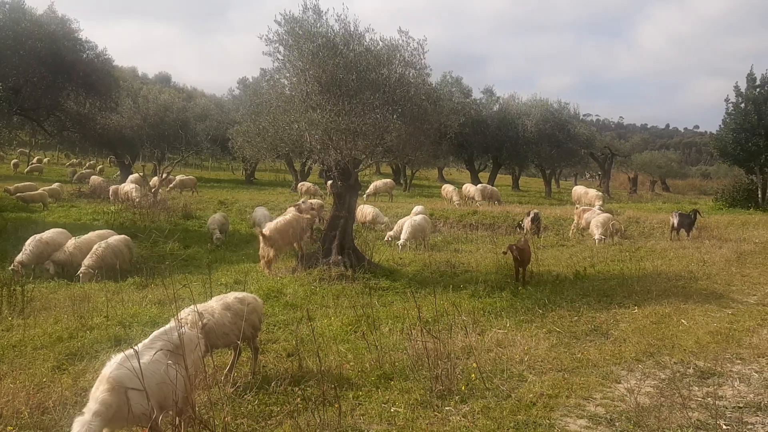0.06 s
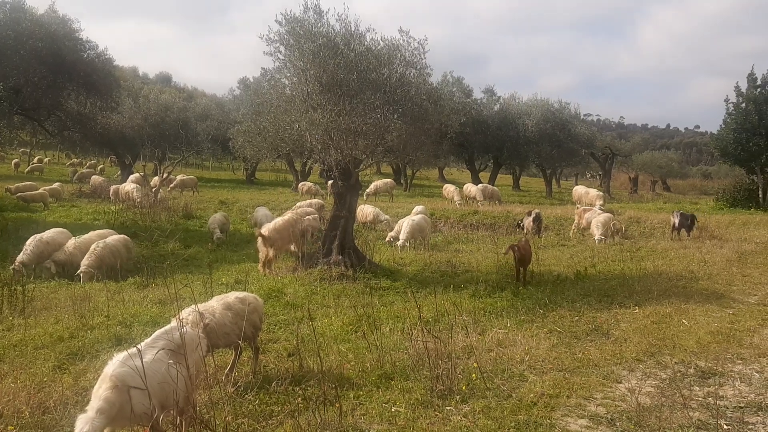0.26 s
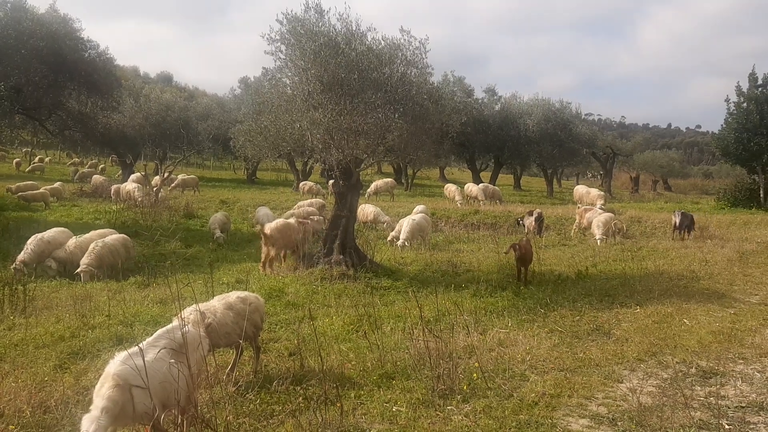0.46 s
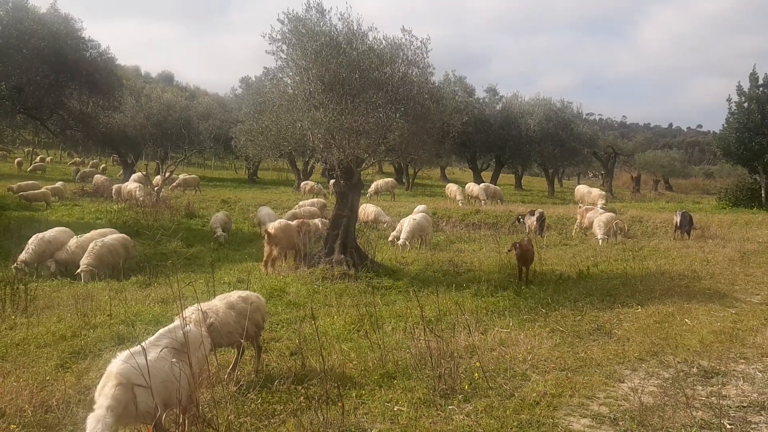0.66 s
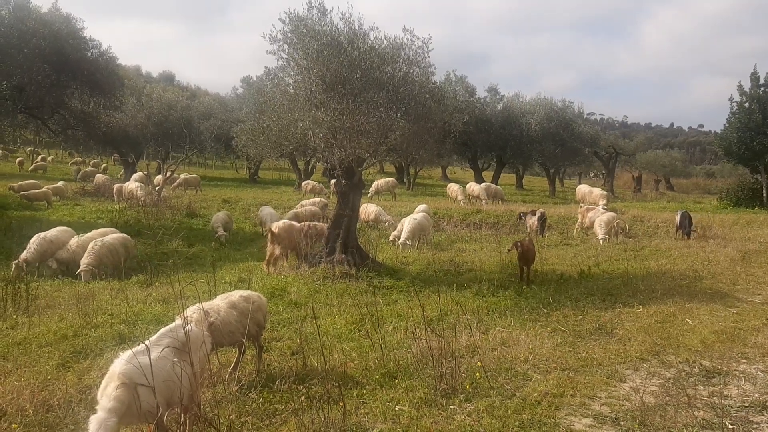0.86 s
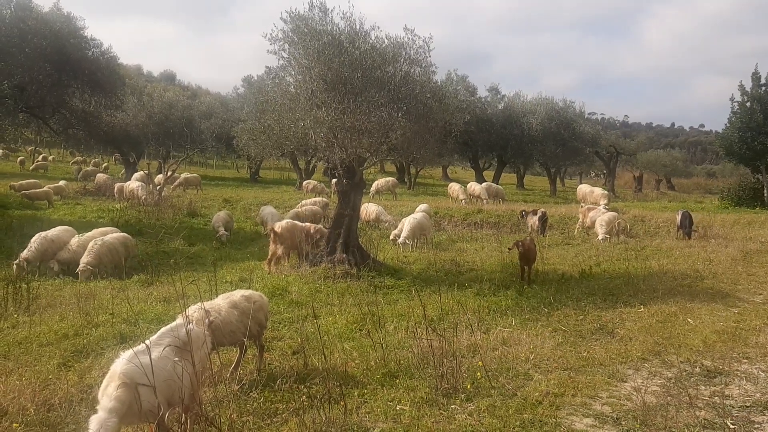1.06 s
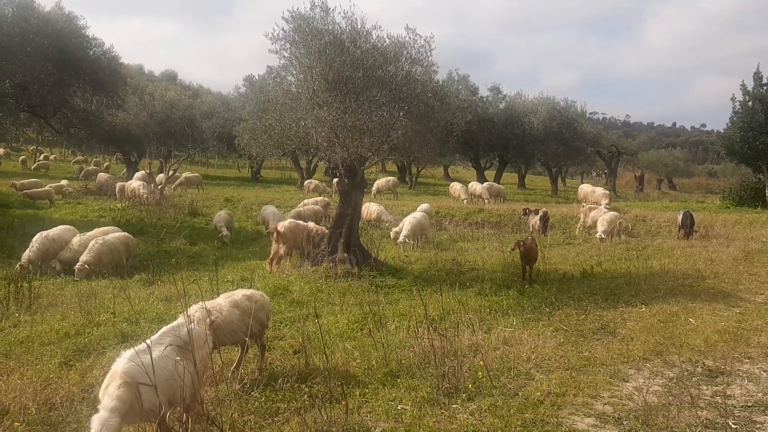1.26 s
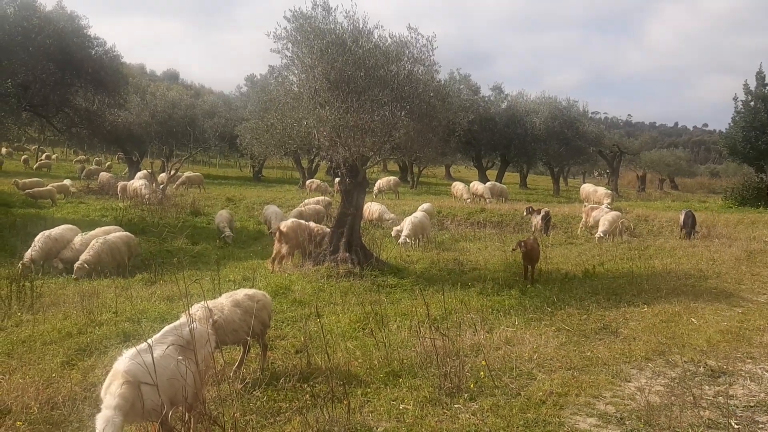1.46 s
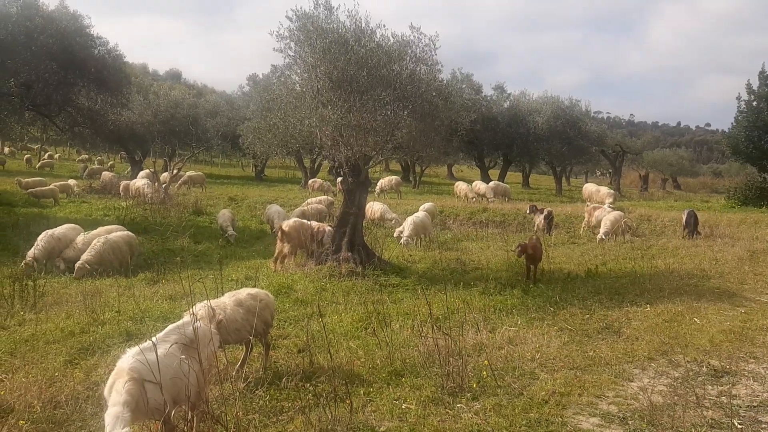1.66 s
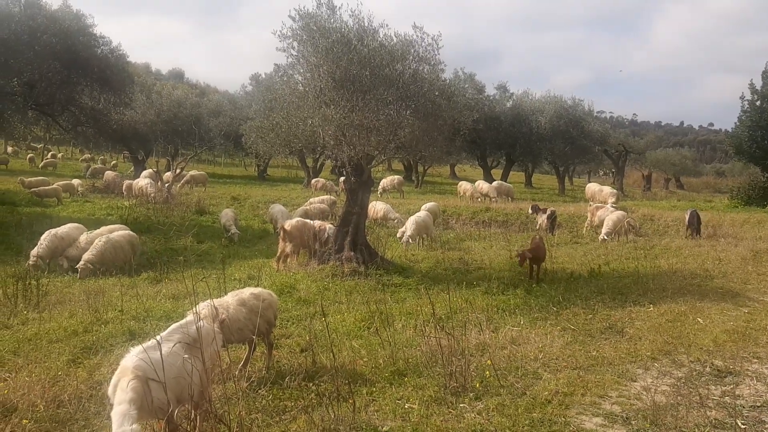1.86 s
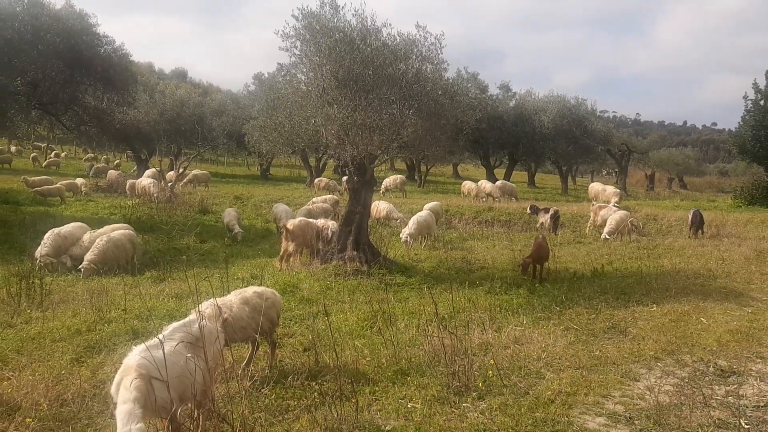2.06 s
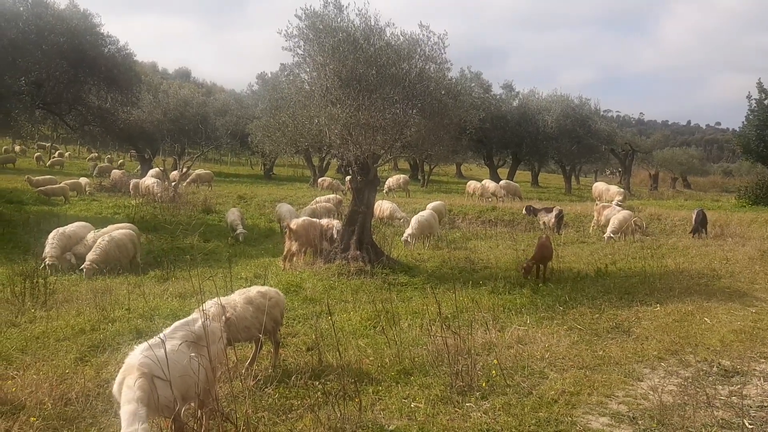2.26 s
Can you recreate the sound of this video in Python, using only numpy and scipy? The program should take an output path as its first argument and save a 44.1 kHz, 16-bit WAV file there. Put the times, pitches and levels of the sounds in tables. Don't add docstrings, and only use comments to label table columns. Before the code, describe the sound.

A metal sheep bell a few steps away clanks at uneven intervals, its wavering ring choked or left to fade; wind thumps on the left of a stereo microphone, grass tears, twigs tick, open grove hisses faintly.

```python
import sys
import numpy as np
from scipy import signal
from scipy.fft import rfft, irfft
from scipy.io import wavfile
from scipy.ndimage import uniform_filter1d

SR = 44100
rng = np.random.default_rng(int(sys.argv[2]) if len(sys.argv) > 2 else 0)


def undo_db(level):
    steps = np.asarray(level, float) / 20
    return 10 ** steps


def dump_mix(stems):
    frames = np.atleast_2d(stems).T
    limited = np.clip(frames, -1, 1)
    pcm = np.round(limited * 32767).astype(np.int16)
    wavfile.write(sys.argv[1], SR, pcm)


N = 101429
SIDE = np.array([[.5], [-.5]])

# (time [s], damping by the neck [ratio], old ring kept [0-1], high modes [dB],
# strike spot [turns])
BLOWS = [
    (0.2095, 0.68, 0.9, -35.5, 0.077),
    (.3466, 0.58, 0, -36, 0.27),
    (0.516, 1.756, 0.19, -28.5, 0.64),
    (0.648, 2.2, 0.69, -79, 0.22),
    (1.0837, 1.456, 0.6, -38, 0.85),
    (1.5263, 0.73, 1, -39.5, 0.7),
    (1.9686, 1.13, 0.6, -50, 0.96),
]
BLOW_FACES = [(0.038, 0.33), (0, 0.84), (0, 0.94), (.5, 1), (0.84, 1), (0, 0.58), (0.95, 0.95)]
# (lower member [Hz]), then (upper member [Hz])
LOWER_HZ = [850, 2214, 4178, 4876, 5887]
UPPER_HZ = [873, 2297, 4279, 5075, 6141]
# (decay T60 [s], left-right [dB], left leads [rad], swing [dB], swing start [turns])
LOWER_MODES = [(1.8, 0, 1 - 1 / 10, 1, 0.13), (0.95, 6.5, 1.42, 3, 0.11), (1.077, -7, -2, 0, 0.083),
               (0.2, -17, 5.5, -4, 0.08), (0.088, -21.5, -6, 0.5, 0.44)]
UPPER_MODES = [(0.62, -3, 1 - 1 / 10, 3.8, 0.24), (1.68, 11, 4.5, 0.33, 1), (0.64, -8.5, -2.5, 4.8, 0.93),
               (0.52, -6, 8, 0.72, 0.065), (0.26, -4, 8, 2, 0.72)]
# (pair 1 [dB], .. pair 5 [dB])
LOWER_DRIVE = [(-45, -56, -35.5, -38.5, -39), (-31, -52, -46, -31.5, -44), (-37, -29.5, -20, -22.5, -84),
               (-88, -88, -78, -39, -63), (-32.5, -35, -36, -41.5, -46.5), (-31, -42, -47, -41.5, -41),
               (-33, -38, -37, -34.5, -84)]
UPPER_DRIVE = [(-30.5, -72, -27, -53, -32), (-30.5, -45, -31, -55, -40.5), (-10, -38, -37, -26.5, -37),
               (-68, -86, -64, -56, -62), (-27, -50.5, -22, -31, -43), (-45.5, -40, -23, -52, -41.5),
               (-30.5, -41, -32, -47, -36)]
BEAT_STARTS = [(0.23, 0.47, 0.38, 0.0026, 0.68), (1, 0.67, 0.38, 0.55, 0.18), (1, 0.47, 1, 0.27, 0.66),
               (0, 0.2, 0, 0, 0), (0.49, 0.42, 0.38, 1, 0.46), (1, 0, 0.78, .13, 0.46),
               (0.35, 0.43, 0.77, 0.77, .76)]
# (level [dB], T60 [s], left-right [dB], start [turns])
TURNED_LOBES = [(-34.5, 5, 2.5, 0.21), (-38, 3.8, 12, 1), (-24.5, 1.7, -4, .9)]
TURNED_HZ = [850, 2297, 4279]
TURNED_LEAD = [0.97, 1.7, -2.1]
# (frequency [Hz], struck in front [dB], struck behind [dB], T60 [s], left-right
# [dB])
THIN_MODES = [(2560, 11, 12, 0.13, 6), (3870, -5, -10, 0.19, 1), (4530, -5, -9, 0.18, -6),
              (6672, 4, 7, 0.34, -9), (6813, -3, -4, 0.47, -7), (6925, 5, 13, 0.28, -9),
              (6998, 5, 8, 0.2, -4), (7582, -5, -7, 0.22, 2), (7935, 6, 14, 0.19, 4),
              (8125, -2, 12, 0.19, 5), (8250, 1, 1, 0.24, 2), (8320, -3, 9, 0.28, 0),
              (8607, -6, -44, 0.36, 0), (9765, -4, 11, 0.15, 3),
              (9880, 7, -14, 0.13, 3), (10118, -4, 12, 0.17, -1), (10252, -3, 7, 0.21, 6),
             (10590, -12, 8, 0.36, 1), (11073, 3, 5, 0.22, 2), (11203, 2, 4, 0.29, 0),
             (11862, 6, -9, 0.19, 5), (12405, 3, 7, 0.15, 4), (12603, 5, -16, 0.17, 14),
             (12740, 0, -9, 0.16, 8), (13125, 7, -3, 0.13, 8), (13410, -7, 10, 0.22, 10),
             (13925, -1, -1, 0.18, 4), (14270, -6, -14, 0.2, 3)]
# (frequency [Hz], level [dB])
CRACK_COLOUR = [(500, -20.5), (1500, -18.5), (2600, -5), (3300, -18.5), (5000, -0.5), (8000, -9.5),
                (9000, -3), (12000, -7.5)]
# (frequency [Hz], left-right [dB])
CLANK_PAN = [(2600, -0.5), (4500, -10), (8000, 16), (12000, 8.5)]
# (time [s], level [dB])
GUSTS = [(0, -88), (.3, -87), (.4, -77), (.47, -50), (.55, -61.5), (.6, -65), (.68, -65.5), (.75, -89),
         (1.2, -78.5), (1.4, -76.5), (1.47, -91), (1.65, -75), (1.78, -69.5), (2.0, -71), (2.12, -95),
         (2.2, -57), (2.26, -42.5), (2.3, -37.5)]
# (frequency [Hz], level [dB])
SOFT_WIND_COLOUR = [(15, -17.5), (30, -27), (58, 3), (120, -5), (200, -12), (400, -12), (900, -94)]
HARD_WIND_COLOUR = [(15, -47), (30, -9), (70, -8), (170, -8), (270, -21), (400, -43), (900, -92)]
# (time [s], level [dB], frequency [Hz], length [s])
BUFFETS = [(0.388, -46.5, 60, 0.0088), (.424, -48, 91, 0.0047), (0.4572, -25, 142, 0.0038),
           (.4737, -27, 92, 0.0066), (.4953, -33, 120, 0.0048), (0.503, -28.5, 70, 0.009),
           (0.514, -36, 169, 0.0018), (.5222, -28.5, 136, 0.0087), (.532, -26.5, 64.4, 0.0095),
           (0.556, -32.5, 58, 0.0097), (0.6534, -31.5, 78, 0.0083), (0.909, -59, 70, 0.011),
           (1.653, -45, 60, .012), (1.735, -32, 166, 0.0034), (1.737, -20.5, 72.4, 0.011),
           (1.836, -46.5, 64, 0.023), (1.928, -39, 54.6, .013), (2.147, -37.5, 81.6, 0.0052),
           (2.16, -39, 50.7, 0.0092), (2.184, -39, 50.6, 0.0093), (2.201, -34, 88.35, 0.0058),
           (2.2214, -24, 90, 0.0044), (2.232, -29, 80, 0.0057), (2.24, -25, 80, 0.0079),
           (2.252, -32, 60, 0.011), (2.2686, -24.5, 160, 0.0026), (2.275, -22.5, 125, 0.0037),
           (2.286, -21, 141, 0.0025), (2.2905, -18.5, 87.5, 0.006)]
# (time [s], length [s], level [dB])
TEARS = [
    (0.57, 0.049, -61.5),
    (2.006, 0.099, -38.5),
]
# (frequency [Hz], level [dB])
TEAR_COLOUR = [(200, -1.5), (350, 6), (600, -15.5), (1400, -4.5), (2700, -1.5), (3500, -10.5), (6000, -12),
               (12000, -51)]
# (time [s], level [dB], frequency [Hz], left-right [dB])
TICKS = [(.0169, -55.5, 8000, 11), (0.1108, -56, 10600, 19), (0.184, -65, 3370, -4), (0.61, -42, 3300, 2),
         (.638, -33, 3150, 1), (.656, -43, 3000, -3), (0.6872, -43, 9900, 15.5), (.733, -50, 9600, 12),
         (.84, -58.5, 11300, 9), (1.26, -50, 1380, 5), (1.7226, -49, 9720, 14), (1.8184, -47, 12100, 13),
         (2.093, -44, 13000, 12), (2.24, -71, 6000, -2)]
# (frequency [Hz], level [dB])
HISS_COLOUR = [(250, -12.5), (600, -1), (1250, -11.5), (2200, -8.5), (3000, -9.5), (4000, -1), (7500, -6),
               (16000, -12)]
# (time [s], level [dB])
FLOCK_STIR = [(0, -2.5), (.3, -1), (.6, 12.5), (.8, -2), (1.05, -2), (1.4, 0), (1.7, 4.5), (2.0, 5.5),
              (2.3, 5)]
# (frequency [Hz], half width [Hz])
VALLEYS = [(2980, 200), (3520, 220), (9100, 330)]
# (frequency [Hz], width [Hz], level [dB])
HOUSING_NOTCHES = [(9040, 680, -10), (3340, 700, -4)]


def evened(x):
    return x / np.sqrt(np.mean(x ** 2) + 1e-20)


def wander(shape, size):
    return evened(uniform_filter1d(rng.standard_normal(shape), size))


def along(points, x):
    return np.interp(x, *np.transpose(points))


def shaped(x, points):
    f, db = np.transpose(points)
    hz = np.fft.rfftfreq(x.shape[-1], 1 / SR)
    colour_db = np.interp(np.log(hz + 1), np.log(f), db)
    return evened(irfft(rfft(x) * undo_db(colour_db), x.shape[-1]))


def add(mix, s, sound):
    part = mix[:, round(s * SR):][:, :sound.shape[1]]
    part += sound[:, :part.shape[1]]


def bell():
    out = np.zeros((2, N))
    for b, ((s, damp, kept, high_db, spot), (face, wide)) in enumerate(zip(BLOWS, BLOW_FACES)):
        choke = out[:, round(s * SR):] * (kept - 1)
        add(out, s, choke * np.minimum(np.arange(choke.shape[1]) / 100, 1))
        ring_pairs(out, s, LOWER_HZ, LOWER_MODES, LOWER_DRIVE[b], np.zeros(5), damp, wide, spot)
        ring_pairs(out, s, UPPER_HZ, UPPER_MODES, UPPER_DRIVE[b], BEAT_STARTS[b], damp, wide, spot)
        if b == 0:
            ring_turned_lobes(out, s)
        ring_thin_modes(out, s, b, face, high_db)
        add(out, s, clank(high_db))
    return out


def ring_pairs(out, s, pitches, modes, drive, starts, damp, wide, spot):
    t = np.arange(min(N - round(s * SR), SR)) / SR
    for hz, db, start, (t60, pan_db, lead, swing_db, turn) in zip(pitches, drive, starts, modes):
        t60 = t60 / damp
        heard = t[:round(SR * t60)]
        add(out, s, ring(heard, hz, db, t60, pan_db, lead, wide * swing_db, spot + turn, start))


def ring_turned_lobes(out, s):
    t = np.arange(min(N - round(s * SR), SR)) / SR
    for (db, t60, pan_db, start), hz, lead in zip(TURNED_LOBES, TURNED_HZ, TURNED_LEAD):
        add(out, s, ring(t, hz, db, t60, pan_db, lead, 0, 0, start, rise_s=0.064))


def ring_thin_modes(out, s, b, face, high_db):
    flutter, thin_db = 0.4, -13.5
    t = np.arange(min(N - round(s * SR), SR // 4)) / SR
    for k, (hz, front_db, back_db, t60, pan_db) in enumerate(THIN_MODES):
        shimmer = 1 + flutter * wander((2, len(t)), 500)
        db = high_db + thin_db + front_db + face * (back_db - front_db)
        add(out, s, shimmer * ring(t, hz, db, t60, pan_db, k + b, 0.4, k / 4))


def ring(t, hz, db, t60, pan_db, lead, swing_db, turn, start=0, rise_s=0):
    rise_cycles, swing_hz = 1.43, 2.27
    swing = swing_db * np.sin(2 * np.pi * (swing_hz * t + turn) + SIDE)
    rise = 1 - np.exp(-t / (rise_cycles / hz + rise_s))
    level = undo_db(db + SIDE * pan_db + swing - 60 * t / t60)
    return rise * level * np.sin(2 * np.pi * (hz * t + start) + SIDE * lead)


def clank(db):
    crack_db, crack_t60 = 16.5, 0.018
    thicket_db, thicket_t60, jag_db = 4, 0.17, 8
    t = np.arange(SR // 4) / SR
    hz = np.fft.rfftfreq(len(t), 1 / SR)
    crack, thicket = shaped(rng.standard_normal((2, 2, len(t))), CRACK_COLOUR)
    jag = wander((2, len(hz)), 12)
    thicket = evened(irfft(rfft(thicket) * undo_db(jag_db * jag + SIDE * along(CLANK_PAN, hz)), len(t)))
    crack = undo_db(db + crack_db - 60 * t / crack_t60) * crack
    thicket = undo_db(db + thicket_db - 60 * t / thicket_t60) * thicket
    return np.minimum(t / 0.0044, 1) * (crack + thicket)


def wind():
    wind_db, right_db = 9.5, -45
    t = np.arange(N) / SR
    gust_db = along(GUSTS, t)
    hard = np.clip((gust_db + 74) / 20, 0, 1)
    a, b = rng.standard_normal((2, 2, N))
    push = (1 - hard) * shaped(a, SOFT_WIND_COLOUR) + hard * shaped(b, HARD_WIND_COLOUR)
    power = uniform_filter1d(uniform_filter1d(push ** 2, 700), 700)
    push = push / np.sqrt(power + 0.0072) * undo_db(gust_db + wind_db)
    puffs = np.zeros(N)
    for s, db, hz, length in BUFFETS:
        puffs -= undo_db(db) * np.exp(-((t - s) / length) ** 2) * np.cos(2 * np.pi * hz * (t - s))
    return (push + puffs) * undo_db(np.array([[0], [right_db]]))


def tearing():
    fibres_per_s, fibre_spread_db = 3000, 2.5
    out = np.zeros((2, N))
    for s, length, db in TEARS:
        u = np.arange(SR // 4) / SR / length
        strength = undo_db(fibre_spread_db * rng.exponential(1, len(u)))
        snaps = (rng.random(len(u)) < fibres_per_s / SR) * strength
        snaps = snaps * rng.standard_normal(len(u)) + rng.standard_normal((2, len(u)))
        clumps = wander(len(u), 300)
        pull = np.minimum(.5 + 2 * u, 1) * undo_db(-20 * np.maximum(u - .25, 0) + 2 * clumps)
        add(out, s, undo_db(db) * pull * shaped(snaps, TEAR_COLOUR))
    return out


def twigs():
    tick_t60 = 0.0079
    out = np.zeros((2, N))
    t = np.arange(800) / SR
    for s, db, hz, pan_db in TICKS:
        band = [(hz / 4, -40), (hz / np.sqrt(2), 0), (hz * np.sqrt(2), 0), (hz * 2, -30)]
        snap = shaped(rng.standard_normal(len(t)), band)
        add(out, s, snap * undo_db(db - 60 * t / tick_t60 + pan_db * SIDE))
    return out


def hiss():
    hiss_db, same = -62, 0.13
    a, b = rng.standard_normal((2, N))
    ports = np.array([a, same * a + np.sqrt(1 - same ** 2) * b])
    x = shaped(ports, [(60, -0.34)] + HISS_COLOUR)
    flicker_db = wander(N, 1500)
    return x * undo_db(hiss_db + along(FLOCK_STIR, np.arange(N) / SR) + flicker_db)


def scene():
    return bell() + wind() + tearing() + twigs() + hiss()


def housing(x):
    edge_hz = 15900
    hz = np.fft.rfftfreq(N, 1 / SR)
    colour_db = -np.maximum(hz - edge_hz, 0) / 20
    for f, width, db in HOUSING_NOTCHES:
        colour_db += db * np.exp(-((hz - f) / width) ** 2)
    return irfft(rfft(x) * undo_db(colour_db), N)


def empty_valleys(x):
    margin_db, waver_db = 43, 3
    hz = np.fft.rfftfreq(N, 1 / SR)
    power = uniform_filter1d((x ** 2).mean(0), 900)
    for f, width in VALLEYS:
        valley = irfft(rfft(x) * np.exp(-((hz - f) / width) ** 6), N)
        valley_power = abs(uniform_filter1d((valley ** 2).mean(0), 900))
        under_db = 10 * np.log10(power / (valley_power + 1e-14) + 1e-9)
        shut = under_db + waver_db * wander(N, 1800) > margin_db
        x = x - valley * uniform_filter1d(1. * shut, 400)
    return x


def band_limit(x):
    return signal.sosfilt(signal.butter(12, 16470, fs=SR, output="sos"), x)


def record(dry):
    mix = empty_valleys(housing(dry))
    return band_limit(mix)


dry = scene()
out = record(dry)
dump_mix(out)
```